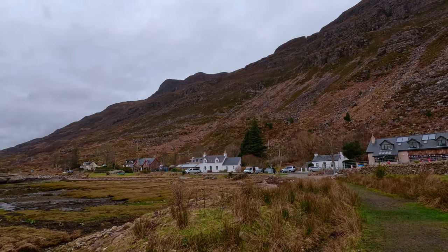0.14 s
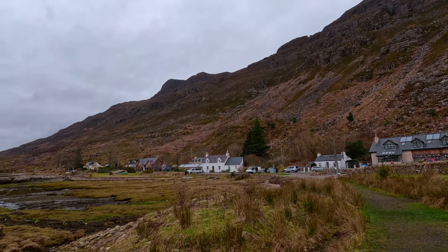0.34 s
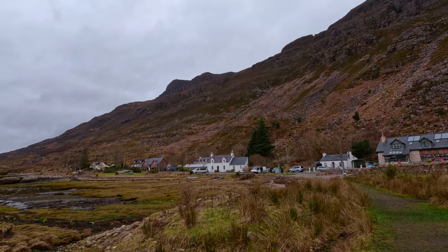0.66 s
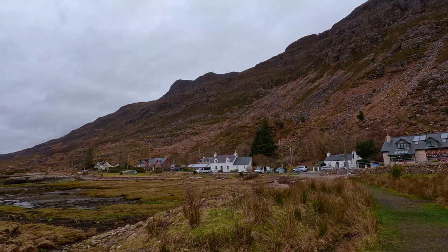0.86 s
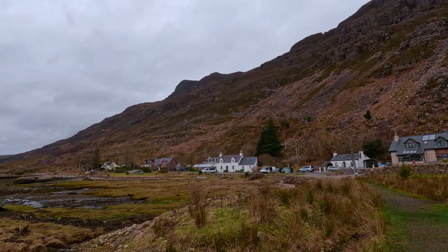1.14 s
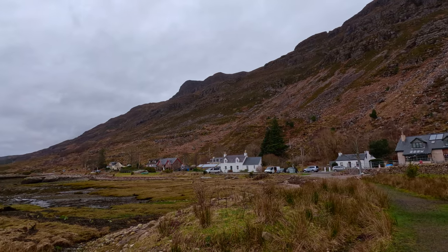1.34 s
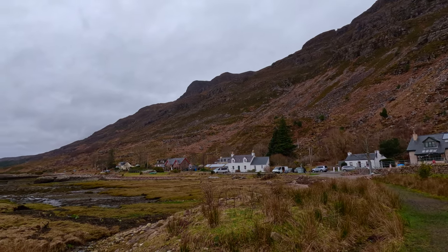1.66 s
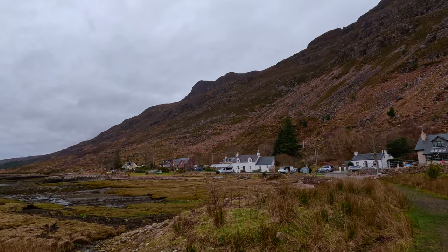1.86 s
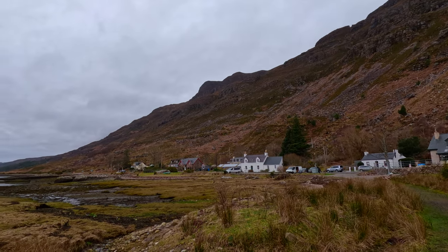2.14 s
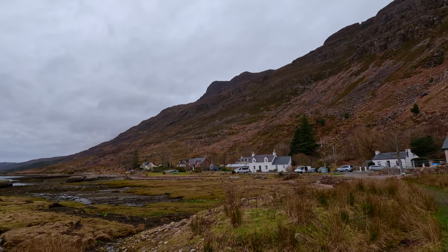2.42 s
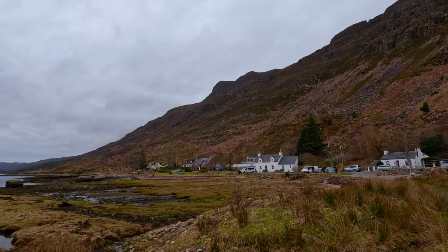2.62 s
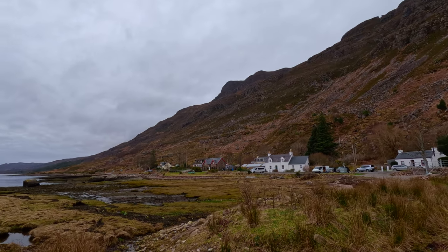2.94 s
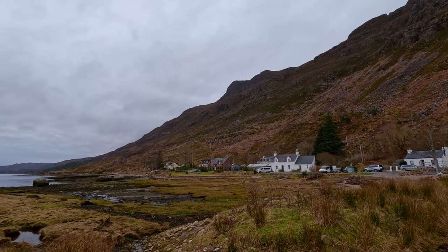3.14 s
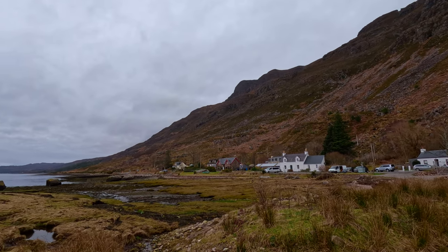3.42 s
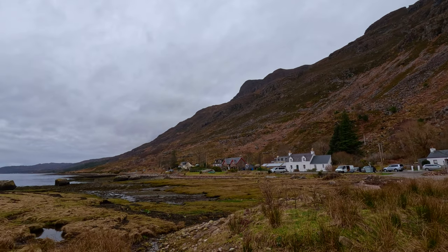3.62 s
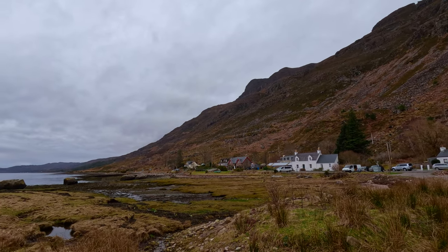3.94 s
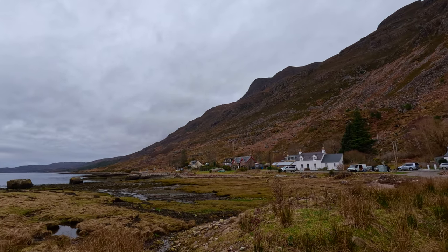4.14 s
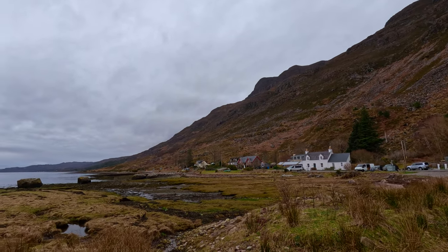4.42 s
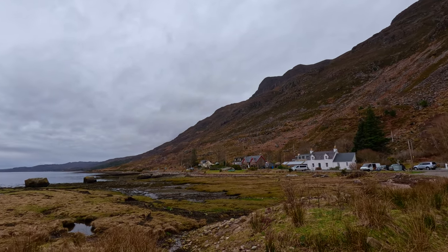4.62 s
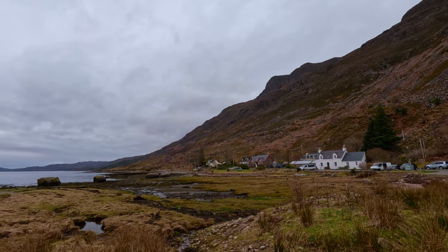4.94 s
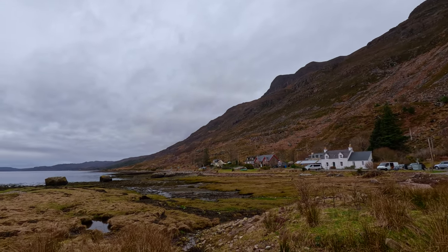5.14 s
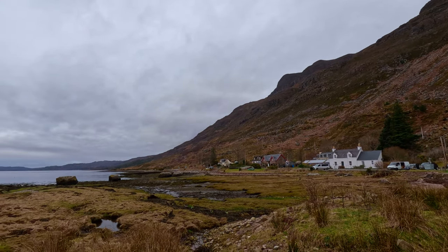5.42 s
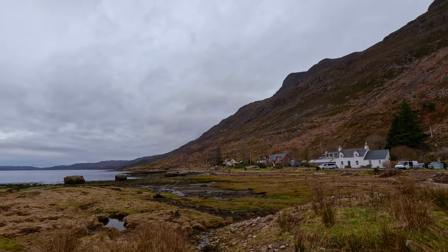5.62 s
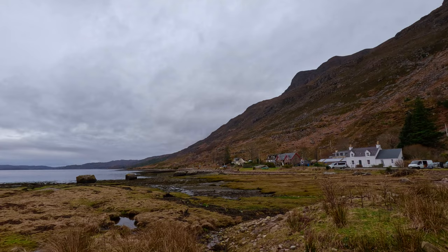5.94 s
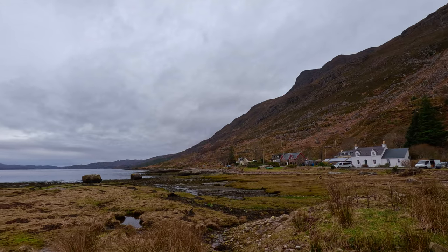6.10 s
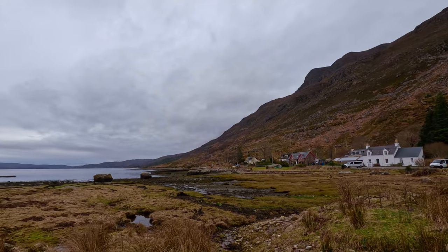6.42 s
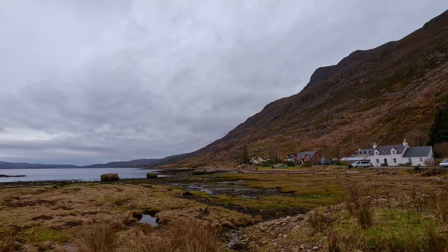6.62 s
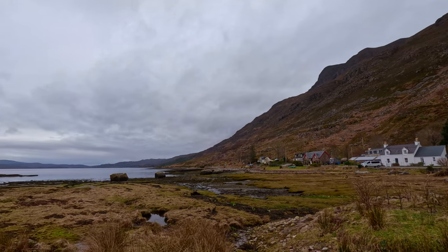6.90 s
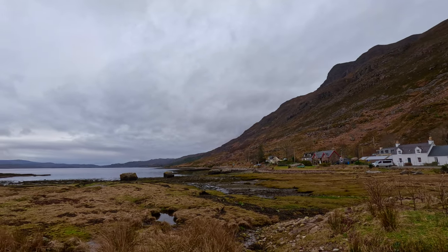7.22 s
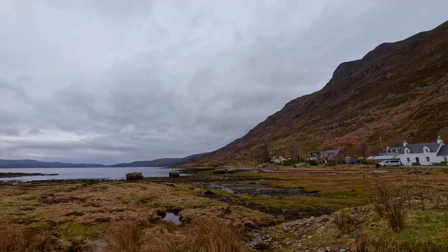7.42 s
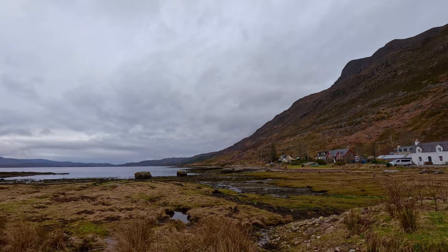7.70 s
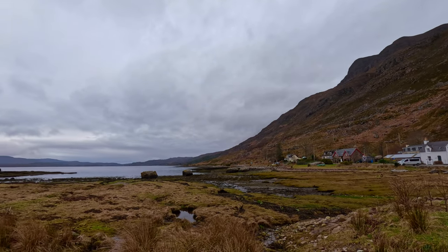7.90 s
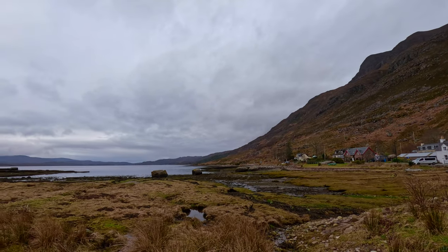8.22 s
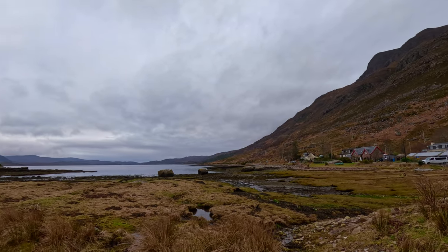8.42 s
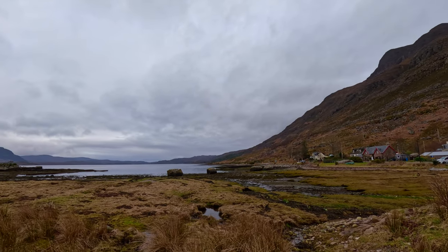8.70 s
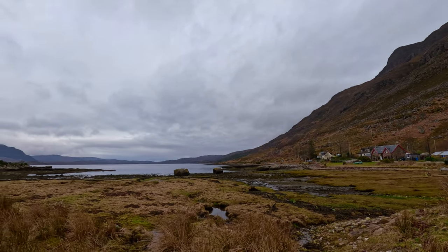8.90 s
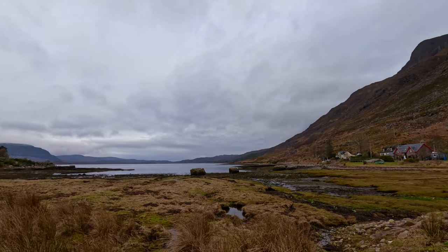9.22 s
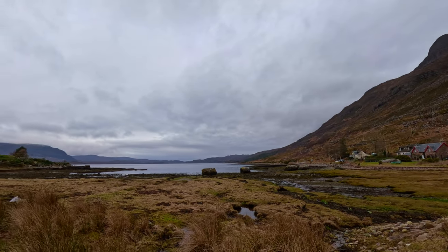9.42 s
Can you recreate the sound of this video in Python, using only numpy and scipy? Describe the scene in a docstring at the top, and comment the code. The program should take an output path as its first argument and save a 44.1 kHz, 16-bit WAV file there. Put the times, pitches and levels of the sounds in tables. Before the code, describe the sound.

A handheld stereo microphone catches sparse birdsong in open country. Whistles and thin distant chirps lead to two hoarse tweets, repeated buzzing calls and a short sparkling song, nearer and clearer on the left. Then a remote thud returns from the hillside. Light wind rumbles on the microphone, growing at the close, with soft low bumps, tiny dry ticks and a wavering far engine in steady airy hush.

```python
"""Small birds call from bushes on the shore of a sea loch under a steep hill: one bright song, two tweets,
a buzzy call said four times, slurred whistles, far twitter and harsh chirps, all gliding tones with weak octaves,
thickened by sprays of echoes. Shaped noise bursts make a distant bang that comes back from the slope, and grass ticks.
The hand bumps the recorder in low swings; light wind, filtered noise under slow gusts, rumbles on the microphone
and freshens at the end. A far engine hums as a wavering tone in a steady hush of noise."""
import sys
import numpy as np
from scipy import signal
from scipy.fft import rfft, irfft, next_fast_len
from scipy.io import wavfile
from scipy.ndimage import uniform_filter1d

SR = 44100
rng = np.random.default_rng(int(sys.argv[2]) if len(sys.argv) > 2 else 0)


def generate_wav(signal):
    """Clip the signal to [-1, 1] and save it as 16-bit WAV at the path in sys.argv[1]."""
    frames = np.transpose(np.atleast_2d(signal))
    scaled = np.clip(frames, -1, 1) * 32767
    pcm = np.round(scaled).astype(np.int16)
    wavfile.write(sys.argv[1], SR, pcm)


N = 421155
TIME = np.arange(N) / SR

# All levels are relative, before the gains in the functions. Pan is left minus right; "peak" is the place
# of the loudest moment in a note, from 0 to 1; f is the centre of a glide unless a start or end is named.

# song motif: a high slide plunges to a low whistle and steps up [t/s after its start, f/Hz, level/dB]
OPENING_MOTIF = [(0, 6780, -68), (.011, 5680, -47.5), (.022, 5340, -40.5), (.026, 5810, -42),
                 (.031, 3170, -52), (.039, 3720, -41.5), (.052, 3817, -38.5), (.066, 3750, -48),
                 (.072, 4700, -50), (.087, 4595, -38), (.106, 4100, -51)]
# song motif: a trill runs into a down-slur, dips and hooks upward [t/s after its start, f/Hz, level/dB]
CLOSING_MOTIF = [(0, 5570, -50), (.012, 5200, -47.5), (.026, 5020, -40.5), (.033, 4420, -41),
                 (.043, 3910, -34.5), (.052, 3690, -37.5), (.06, 3310, -46.5), (.066, 4200, -44),
                 (.075, 4350, -42), (.082, 4370, -57)]
# repeats of each motif [t/s, reach of the notes above the pivot as a multiple, gain/dB]
OPENING_REPEATS = [(6.689, .7, -13), (6.865, 1.2, -5), (7.03, 1.0, -0.5)]
CLOSING_REPEATS = [(7.187, 0.97, 0.23), (7.320, 0.8, -1.3), (7.453, 0.29, -0.62)]
PIVOT_HZ = 4330  # only notes above this pitch change from repeat to repeat
# flourish that ends the song [t/s, f/Hz, level/dB]
FLOURISH = [(7.589, 4820, -52), (7.598, 6510, -58.5), (7.607, 7550, -61), (7.612, 5120, -55),
            (7.617, 7000, -61), (7.624, 5660, -46), (7.636, 5160, -47.5), (7.643, 5200, -59)]
# stereo balance of the song by pitch [f/Hz, pan/dB]
SONG_PAN = [(3800, 11), (4500, 2.5), (5600, 2.5)]
# spectrum of the faint noise over the high notes [f/Hz, level/dB]
HIGH_NOTE_NOISE = [(1500, -4), (4500, -3), (7000, -15), (9500, -17), (12500, -20.5)]
# rising tweets [t/s, length/s, time to the pitch leap/s, leap time constant/s, low f/Hz, top f/Hz,
# level/dB, fade by the end/dB]
TWEETS = [(4.033, 0.099, .023, .0115, 1750, 4420, -37, 12),
          (4.281, 0.1, 0.027, 0.0036, 2480, 4540, -37, 22)]
# buzzy calls, one curve each [t/s, f/Hz, level/dB, flutter depth/Hz]
BUZZES = [
    [(4.575, 2430, -57, 330), (4.6, 2300, -52, 220), (4.63, 2100, -56, 90), (4.655, 2280, -57.5, 50),
     (4.70, 2520, -49, 99), (4.727, 2514, -51, 80), (4.742, 2680, -47.5, 190), (4.768, 2330, -53, 90)],
    [(5.476, 2280, -56, 200), (5.5, 2260, -52, 70), (5.52, 2480, -48, 110), (5.543, 2430, -48.5, 120),
     (5.567, 2180, -54, 150), (5.6, 2514, -47.5, 90), (5.64, 2547, -49, 90), (5.66, 2803, -46.5, 260),
     (5.68, 2483, -46, 160), (5.697, 2150, -54, 60)],
    [(6.278, 2070, -58, 40), (6.305, 2270, -50.5, 130), (6.327, 2500, -48.5, 150), (6.365, 2100, -53, 129),
     (6.388, 2180, -51, 130), (6.408, 2580, -48.5, 260), (6.432, 2490, -44, 81), (6.453, 2520, -43, 70),
     (6.476, 2737, -47, 251.6), (6.504, 2240, -51, 110)],
    [(7.06, 2120, -56, 39.8), (7.082, 2220, -53, 50.1), (7.095, 2450, -47.5, 70), (7.125, 2740, -51.5, 190),
     (7.16, 2170, -54.5, 130), (7.19, 2380, -51, 200), (7.23, 2480, -45.5, 110), (7.252, 2648, -45.5, 170),
     (7.27, 2300, -55, 100)],
]
BUZZ_ATTACK_S, BUZZ_RELEASE_S = 0.0034, 0.0035
# short churrs [t/s, length/s, f/Hz, level/dB]
CHURRS = [(4.999, 0.055, 2440, -53.5), (5.923, 0.071, 2510, -55.5), (6.705, 0.047, 2414, -52)]
# whistles [t/s, length/s, start f/Hz, middle f/Hz, end f/Hz before the hook, level/dB, peak, pan/dB]
ARCHED_WHISTLES = [(-0.06, 0.091, 2100, 2810, 2720, -51, 0.47, -1),
                   (0.909, 0.085, 1984, 2863, 2640, -51, 0.9, 2),
                   (1.57, 0.057, 1970, 2330, 2410, -61.5, 0.8, 2)]
FALLING_WHISTLES = [(.082, .15, 2520, 2320, 2347, -49.5, 0.9, 1.8),
                    (1.043, .16, 2650, 2407, 2250, -49.7, 0.74, 1.3)]
HOOK_S = 0.0069  # time constant of a whistle's closing hook
THROB_S, THROB_RATE_HZ = 0.1, 110.6  # the falling whistle's opening throb: duration and rate
# far down-slurs [t/s, f/Hz, level/dB, pan/dB]
SLURS = [(.255, 4000, -66.5, 1), (.378, 3780, -66, -1), (0.506, 3920, -66, 1), (0.551, 5220, -63.5, -5),
         (0.592, 5600, -63, -6), (.683, 5200, -65.5, -7), (0.727, 5400, -59, -5), (2.919, 3670, -54.5, -4),
         (3.45, 4720, -65, -2), (3.483, 3680, -56.5, -4), (3.515, 3060, -57, 1), (3.604, 3130, -60, 4),
         (3.695, 3400, -60, 3), (3.84, 3810, -57, -3), (4.518, 5130, -61, -3), (4.744, 5240, -65, -4),
         (4.955, 5420, -67.5, -4), (5.083, 3620, -60.5, 3), (5.21, 3790, -66, 2), (5.328, 3612, -65, 2),
         (5.476, 3710, -60, -1), (8.64, 2980, -65.5, 6), (9.227, 3890, -58.5, 2), (9.321, 3290, -59.5, 4)]
SLUR_CYCLES = 140  # a down-slur lasts this many cycles, so the high ones are the quick ones
# far rising notes [t/s, length/s, f/Hz, level/dB, pan/dB]
RISES = [(1.572, .04, 4860, -69, 0), (1.729, 0.053, 6220, -66.5, -5), (1.893, 0.045, 6270, -67.5, -6),
         (3.428, 0.026, 4070, -63, -6), (3.787, 0.059, 4060, -62, -5), (7.78, 0.048, 3430, -66, 0),
         (8.70, .05, 6000, -72, -6)]
# far notes that dip and come back up [t/s, length/s, f/Hz, level/dB, pan/dB]
SCOOPS = [(2.095, 0.068, 2740, -67, -5), (3.122, 0.073, 2865, -57, -4), (8.367, 0.052, 3455, -58.5, 8),
          (8.522, 0.055, 2750, -65, 8), (8.672, 0.059, 5090, -69.5, -3)]
# thin, nearly level whistles and pips [t/s, length/s, f/Hz, level/dB]
THIN_NOTES = [(1.79, 0.21, 8100, -93), (2.04, .05, 7700, -81), (2.16, 0.1, 7740, -84),
              (2.33, 0.081, 6720, -74), (2.507, 0.03, 6120, -70), (2.57, 0.088, 7400, -69.5),
              (2.641, 0.21, 7430, -78), (2.212, 0.018, 4180, -66.5), (2.858, 0.04, 4740, -59.5),
              (4.2, 0.087, 7450, -74), (7.765, 0.059, 4300, -67.5), (7.818, 0.069, 4240, -67),
              (7.983, 0.12, 4330, -68), (8.075, 0.14, 4320, -68), (8.81, 0.17, 7840, -77.5),
              (9.02, 0.082, 8050, -74.5), (9.42, .13, 7320, -83), (9.21, 0.02, 4020, -65),
              (9.312, 0.017, 4150, -61), (9.401, .013, 4570, -62.5), (9.436, 0.021, 4240, -60.5),
              (9.44, 0.034, 3750, -61), (9.465, 0.028, 4300, -59.5), (9.52, .013, 4650, -62.5)]
# quavering notes [t/s, length/s, f/Hz, level/dB]
QUAVERS = [(3.432, 0.039, 3210, -55.5), (7.818, 0.072, 3700, -64), (8.285, 0.049, 3060, -62.5)]
# far note shapes: start and end pitch as multiples of the middle pitch
SLUR_ARC, RISE_ARC, SCOOP_ARC, THIN_ARC = (1.16, .91), (0.79, 0.9), (1.25, 1.1), (1.014, 0.96)
# faint upward flick after a down-slur [start multiple, end multiple of the middle pitch]
REBOUND_ARC = (.87, 1.15)
# harsh, sparrow-like chirps [t/s, length/s, f/Hz, level/dB]
CHIRPS = [(.02, 0.09, 3740, -69), (0.626, 0.054, 2960, -66), (0.795, 0.08, 3420, -66),
          (0.781, 0.064, 4950, -71), (1.072, 0.039, 3450, -64), (2.696, 0.038, 5300, -68.5),
          (2.724, 0.085, 3090, -65), (2.89, .05, 5160, -69), (2.908, 0.063, 3110, -64),
          (3.007, 0.037, 2520, -61), (3.356, .04, 4090, -66), (3.405, 0.023, 3590, -64),
          (3.879, 0.082, 3490, -66.5), (4.498, 0.082, 3880, -69), (5.064, 0.05, 3380, -63.5),
          (5.908, 0.074, 3160, -63), (6.049, .11, 3250, -65.5), (6.255, 0.069, 3750, -66.5),
          (9.299, 0.041, 3400, -63.5)]
# delay of the left port, in samples, for birds in front and off to the side
FRONT_LAG, SIDE_LAG = 2, 6

BANG_S, BANG_DB = 8.158, -43
# spectrum of the bang [f/Hz, level/dB]
BANG_COLOUR = [(250, -25), (420, -17), (600, -1), (820, 2.5), (1030, -1), (1400, -13), (1700, 4),
               (2300, -12), (2700, -6.5), (3200, -20), (4400, -20), (7000, -47)]
# spectrum of the answer from the slope [f/Hz, level/dB]
SLOPE_COLOUR = [(300, -19), (700, -8.5), (1600, 0), (2600, -9.5), (4500, -13.5), (8000, -55)]
# dry ticks in the grass, and a harsh click as the buzzy call starts at 5.476 s [t/s, level/dB]
TICKS = [(0.31, -70), (0.6397, -69), (1.171, -67), (1.544, -72), (2.781, -69.5), (3.6444, -71),
         (3.6632, -66), (3.7299, -69), (4.497, -70), (5.6316, -70), (3.385, -84), (5.476, -74.5),
         (6.073, -71)]
# faint knocks [t/s, level/dB, f/Hz]
KNOCKS = [(.405, -57, 1740), (3.384, -55, 1850), (4.359, -56, 1790), (6.822, -58, 1255), (7.70, -55, 735),
          (8.46, -56, 1040)]
# spectrum of ticks and of the tweets' hiss [f/Hz, level/dB]
HISS = [(1000, -24), (3000, 3.5), (7000, 0), (9000, -12), (12500, -26), (15000, -39)]
# low thumps on the microphone [t/s, length/s, f/Hz, level/dB]
THUMPS = [(0.097, 0.12, 53.7, -42), (1.558, 0.2, 29.6, -36.5), (3.511, 0.062, 32.3, -33),
          (4.814, 0.063, 48, -33.5), (5.921, 0.076, 42, -40), (6.184, 0.11, 41, -39.5),
          (7.625, 0.083, 46, -31)]
# spectra of the slow and the quick wind pressure on the microphone [f/Hz, level/dB]
RUMBLE = [(10, 5), (24, 4), (48, -3.5), (80, -11), (150, -27), (400, -66)]
EDDIES = [(40, -36.5), (90, 2.5), (170, -2), (270, -10), (400, -24), (800, -54.5)]
# wind layers: level at the start (dB), growth (dB per s), added gain once fresh (dB)
RUMBLE_LEVEL, EDDY_LEVEL = (-53.5, 0.82, 8.6), (-73, 1.614, 3.7)
FRESHENS_S, FRESHEN_TIME_S = 8.39, 0.95
# single buffets of wind [t/s, level/dB]
BUFFETS = [(8.766, -49.5), (8.827, -48), (8.874, -48), (9.104, -48.5), (9.156, -40.5), (9.312, -46.5),
           (9.368, -45), (9.474, -51)]
# far engine [t/s, f/Hz, level/dB]
ENGINE = [(0, 97, -53.5), (1.3, 94.4, -67.5), (2.2, 96.84, -56), (3.2, 105.8, -79), (4.2, 108.5, -57.5),
          (5.6, 116.3, -59.5), (6.5, 119, -63.5), (7.3, 118, -51), (8.2, 117.2, -63)]
# spectrum of the distant hush [f/Hz, level/dB]
AIR = [(40, -31.5), (100, -7), (170, -16.5), (340, -26), (520, -28), (850, -31.5), (1020, -26), (1400, -25),
       (2600, -32), (4300, -38), (7500, -45), (8800, -54.5), (12000, -64), (14000, -73.5)]
AIR_DB, TREBLE_HZ = -60.5, 3500
TOP_HZ = 13500  # upper limit of the band


def birds():
    """Scattering: near birds stay clear, thickened by the twigs and ground around them; far ones are wetter."""
    close = scatter(song(), wet_db=-8.5, t60=.06) + scatter(tweets(), wet_db=-12, t60=.04)
    near = scatter(close, wet_db=-21, t60=.6)
    middle = scatter(whistler(), wet_db=-9.5, t60=.5) + scatter(buzzy_bird(), wet_db=-8, t60=.75)
    far = scatter(twitter(), wet_db=-5.5, t60=.45) + scatter(chirps(), wet_db=-2, t60=.4)
    return near + middle + far


def song(noise_db=-13, high_hz=6200):
    """Frequency glides: two motifs three times each, then a flourish; a little shaped noise follows the highest notes."""
    tone = sum(phrase(rows) for rows in repeated(OPENING_MOTIF, OPENING_REPEATS))
    tone += sum(phrase(rows, warble_hz=402) for rows in repeated(CLOSING_MOTIF, CLOSING_REPEATS))
    tone += phrase(FLOURISH, rough=0.013)
    high = signal.sosfilt(signal.butter(4, high_hz, "high", fs=SR, output="sos"), tone)
    high_level = uniform_filter1d(np.abs(high).mean(axis=0), SR // 200)
    return tone + undb(noise_db) * high_level * noise(HIGH_NOTE_NOISE, 0.79)


def repeated(motif, repeats):
    """Scaling above a pivot: low notes keep their pitch while high ones reach more or less far."""
    return [[(s + after, min(hz, PIVOT_HZ) + reach * max(hz - PIVOT_HZ, 0), db + gain_db)
             for after, hz, db in motif]
            for s, reach, gain_db in repeats]


def phrase(rows, warble_hz=0, warble_s=0.035, warble_rate=165, rough=0.0093, flutter=0.3):
    """Frequency modulation of one unbroken stroke, optionally trilled at first; low notes lie further left."""
    s, pitch, db = np.transpose(rows)
    t = np.arange(s[0], s[-1], 1 / SR)
    age = t - s[0]
    trill = warble_hz * np.cos(2 * np.pi * warble_rate * age) * np.exp(-(age / warble_s) ** 10)
    glide = uniform_filter1d(np.interp(t, s, pitch), size=130)
    hz = glide * (1 + rough * walk(700, len(t))) + trill
    gain = undb(np.interp(t, s, db)) * signal.windows.tukey(len(t), 1 / 20)
    gain *= 1 + flutter * walk(264, len(t))
    pan_db = np.interp(hz, *np.transpose(SONG_PAN))
    out = np.zeros((2, N))
    add(out, s[0], syrinx(hz, gain, pan_db, SIDE_LAG, overtone_db=-52))
    return out


def tweets(rasp_rough=0.014, octave_db=3, upper_db=-7, half_db=-8, pan_db=4, hiss_db=-11,
           drop_hz=650, drop_s=0.0048, hoarse_db=-19.0, full_rasp=0.62):
    """Overtones and half-tones with hiss make a hoarse start that clears as the pitch climbs, then drops."""
    multiples = np.arange(3, 9) / 2
    partial_dbs = [half_db, octave_db, half_db, upper_db, half_db + 2 * upper_db, 3 * upper_db]
    out = np.zeros((2, N))
    for s, length, leap_at, leap_s, low_hz, top_hz, db, fade in TWEETS:
        t = np.arange(int(length * SR)) / SR
        climb = 1 / (1 + np.exp((leap_at - t) / leap_s))
        rasp = 1 - climb
        pitch = low_hz + (top_hz - low_hz) * climb - drop_hz * np.exp((t - length) / drop_s)
        hz = pitch * (1 + (0.0044 + rasp_rough * rasp) * walk(1240, len(t)))
        # the hoarse start is quieter than the clear whistle
        gain = undb(db + hoarse_db * np.minimum(rasp / full_rasp, 1) ** 2 - fade * (t / length) ** 3)
        gain *= signal.windows.tukey(len(t), .16)
        add(out, s, syrinx(hz, gain * (1 - .5 * rasp), pan_db, SIDE_LAG - 1, overtone_db=-40))
        for multiple, partial_db in zip(multiples, partial_dbs):
            partial_gain = gain * undb(partial_db) * rasp ** (multiple - .5)
            add(out, s, syrinx(hz * multiple, partial_gain, pan_db, FRONT_LAG, overtone_db=-33))
        add(out, s, gain * undb(hiss_db) * rasp * noise(HISS, 0.82, len(t)))
    return out


def buzzy_bird(buzz_rate=185, throb=0.038, flutter=0.17, buzz_db=-1.0, rough_hz=20,
               churr_rate=75, churr_hz=330):
    """Frequency modulation: a fast syrinx flutter of varying width, with churrs of rising sweeps between calls."""
    out = np.zeros((2, N))
    for call in BUZZES:
        s, *controls = np.transpose(call)
        t = np.arange(s[0], s[-1], 1 / SR)
        pitch, db, depth = (np.interp(t, s, c) for c in controls)
        rate = buzz_rate * (1 + 0.098 * walk(100, len(t)))
        shake = np.sin(2 * np.pi * np.cumsum(rate) / SR)
        hz = pitch + depth * shake + rough_hz * walk(600, len(t))
        ramps = np.minimum((t - s[0]) / BUZZ_ATTACK_S, (s[-1] - t) / BUZZ_RELEASE_S)
        gain = undb(db + buzz_db) * np.minimum(1, ramps)
        gain *= (1 - throb * shake) * (1 + flutter * walk(300, len(t)))
        add(out, s[0], syrinx(hz, gain, pan_db=5.5, lag=FRONT_LAG, overtone_db=-36.5))
    for s, length, centre_hz, db in CHURRS:
        t = np.arange(int(length * SR)) / SR
        sweeps = churr_hz * signal.sawtooth(2 * np.pi * churr_rate * t, .8)
        hz = centre_hz + sweeps + rough_hz * walk(600, len(t))
        gain = undb(db) * np.sin(np.pi * t / length) ** .5
        add(out, s, syrinx(hz, gain, pan_db=4.0, lag=FRONT_LAG, overtone_db=-27))
    return out


def whistler():
    """Quadratic pitch glides: arched whistles, and long falling ones that throb at first; all hook down at the end."""
    arched = notes(ARCHED_WHISTLES, FRONT_LAG, overtone_db=-32, rough=.005, edge=.6, flutter=.12, hook=.16)
    falling = notes(FALLING_WHISTLES, FRONT_LAG, overtone_db=-32, rough=.008, edge=.7, flutter=.24,
                    hook=.15, throb=.7)
    return arched + falling


def twitter(rebound_db=-9, rebound_s=0.026):
    """Shared pitch contours: far birds slur down and flick faintly up, rise, scoop, quaver and whistle thinly."""
    slurs = [(s, SLUR_CYCLES / hz, hz, db, pan_db) for s, hz, db, pan_db in SLURS]
    rebounds = [(s + length, rebound_s, hz, db + rebound_db, pan_db) for s, length, hz, db, pan_db in slurs]
    rows = shaped(slurs, SLUR_ARC) + shaped(rebounds, REBOUND_ARC)
    quick = notes(rows, FRONT_LAG, overtone_db=-37, rough=.014, edge=.6, flutter=.35)
    rows = shaped(RISES, RISE_ARC) + shaped(SCOOPS, SCOOP_ARC) + shaped(THIN_NOTES, THIN_ARC)
    plain = notes(rows, FRONT_LAG, overtone_db=-37, rough=.005, edge=.45, flutter=.28)
    quavers = notes(shaped(QUAVERS, THIN_ARC), FRONT_LAG, overtone_db=-39, rough=0.0079, edge=0.38,
                    flutter=0.16, warble_hz=220, warble_rate=75)
    return quick + plain + quavers


def chirps(rough=0.042, upper_ratio=1.5, upper_db=-11):
    """Two-voice phonation: both sides of the syrinx sound at once, unsteadily, and slide down together."""
    low = [(s, length, hz * 1.13, hz, hz * 0.78, db, .5, 0) for s, length, hz, db in CHIRPS]
    high = [(s, length, *(upper_ratio * np.array(arc)), db + upper_db, peak, pan)
            for s, length, *arc, db, peak, pan in low]
    return notes(low + high, FRONT_LAG, overtone_db=-32.0, rough=rough, edge=0.13, flutter=0.34)


def chorus(count=170, db=-76, low_hz=2900, high_hz=6200, spread_db=3, dull_db=7):
    """Air absorption: birds at the edge of hearing drop random short notes, mostly falling, the high ones duller."""
    rows = []
    for when, pitch, length, loud, side, slide in rng.random((count, 6)):
        hz = low_hz + (high_hz - low_hz) * pitch ** 2
        fall = 0.42 * slide - .16
        level_db = db + spread_db * (2 * loud - 1) - dull_db * pitch ** 2
        arc = (hz * (1 + fall), hz, hz * (1 - fall / 2))
        rows.append((when * N / SR, 0.024 + 0.048 * length, *arc, level_db, .5, 6 * (side - .5)))
    calls = notes(rows, FRONT_LAG, overtone_db=-32.0, rough=.012, edge=1.0, flutter=0.29)
    return scatter(calls, wet_db=0, t60=0.11)


def shaped(rows, arc):
    """Similar contours: notes share one pitch shape, peak midway, and lie straight ahead if no side is given."""
    return [(s, length, hz * arc[0], hz, hz * arc[1], db, .5, pan_db[0] if pan_db else 0)
            for s, length, hz, db, *pan_db in rows]


def notes(rows, lag, overtone_db, rough, edge, flutter, warble_hz=0, warble_rate=0, hook=0, throb=0):
    """Frequency and amplitude modulation: each note slides along an arc while it swells, flutters and fades."""
    out = np.zeros((2, N))
    for s, length, start_hz, middle_hz, end_hz, db, peak, pan_db in rows:
        n = int(length * SR)
        u = np.linspace(0, 1, n)
        age = u * length
        arc = np.polyval(np.polyfit([0, .5, 1], [start_hz, middle_hz, end_hz], 2), u)
        arc *= 1 - hook * np.exp((u - 1) * length / HOOK_S)
        warble = warble_hz * np.sin(2 * np.pi * warble_rate * age)
        hz = arc * (1 + rough * walk(700, n)) + warble
        swell = arch(u, peak) ** edge
        swell *= 1 + flutter * walk(260, n)
        throb_depth = throb * np.clip(2 - age / THROB_S * 2, 0, 1)
        swell *= 1 + throb_depth * np.sin(2 * np.pi * THROB_RATE_HZ * age)
        gain = undb(db) * swell / np.sqrt(np.mean(swell ** 2))
        add(out, s, syrinx(hz, gain, pan_db, lag, overtone_db))
    return out


def arch(u, peak):
    """Sinusoidal envelope: rises from 0 to 1 at the place peak and falls back to 0 as u goes from 0 to 1."""
    return np.abs(np.sin(np.pi * np.interp(u, [0, np.clip(peak, .05, .95), 1], [0, .5, 1])))


def syrinx(hz, gain, pan_db, lag, overtone_db):
    """Harmonic oscillation: a tone with its octave; phase delay makes it reach the left port lag samples later."""
    phase = 2 * np.pi * (np.cumsum(hz) - np.outer([lag, 0], hz)) / SR
    tone = np.sin(phase) + undb(overtone_db) * np.sin(2 * phase)
    # the divisor keeps the total power of the two sides constant
    balance = undb(np.outer([1, -1], pan_db) / 2) / np.sqrt(np.cosh(pan_db * np.log(10) / 20))
    return gain * tone * balance


def scatter(sound, wet_db, t60):
    """Multiple scattering: ground and bushes send back a thin spray of echoes, decaying 60 dB in t60 seconds."""
    t = np.arange(SR) / SR
    # cubing the noise leaves a few strong echoes among many weak ones
    spray = rng.standard_normal((2, SR)) ** 3 * undb(-60 * t / t60) * (1 - np.exp(-t / .004))
    spray /= np.sqrt(np.sum(spray ** 2, axis=1, keepdims=True))
    return sound + undb(wet_db) * signal.fftconvolve(sound, spray, axes=1)[:, :N]


def bang(blow_s=0.026, echo_db=-11, echo_s=0.038, echo_swell_s=0.036, tail_db=-18, tail_t60=3.3):
    """Reflection: the near slope answers a distant blow in a short swell, the far hillside in a dying wash."""
    out = np.zeros((2, N))
    t = np.arange(SR) / SR
    blow = (1 - np.exp(-t / .005)) * (np.exp(-(t / blow_s) ** 4) + .25 * np.exp(-t / .03))
    add(out, BANG_S, undb(BANG_DB) * blow * noise(BANG_COLOUR, 0.53, len(t)))
    age = t / echo_swell_s
    echo = undb(BANG_DB + echo_db) * age * np.exp(1 - age) * noise(SLOPE_COLOUR, 0.42, len(t))
    add(out, BANG_S + echo_s, echo)
    tail = undb(BANG_DB + tail_db - 60 * t / tail_t60) * noise(SLOPE_COLOUR, 0.7, len(t))
    add(out, BANG_S, tail)
    return out


def ticks(tick_db=2, tick_s=0.019, rise_s=0.00019, knock_s=0.01):
    """Impulsive excitation: dry stalks tick as decaying noise; faint knocks are noise peaked at a pitch."""
    out = np.zeros((2, N))
    t = np.arange(SR // 10) / SR
    rise = 1 - np.exp(-t / rise_s)
    for s, db in TICKS:
        add(out, s, undb(db + tick_db) * rise * np.exp(-t / tick_s) * noise(HISS, 1.0, len(t)))
    for s, db, hz in KNOCKS:
        body = [(hz / 4, -26), (hz, 0), (hz * 1.74, -5), (hz * 4, -28)]
        add(out, s, undb(db) * rise * np.exp(-t / knock_s) * noise(body, 0.92, len(t)))
    return scatter(out, wet_db=-2.0, t60=0.073)


def thumps(right_db=4):
    """Low-frequency displacement: soft pushes on the microphone, harder on the right, as uneven slow swings."""
    out = np.zeros((2, N))
    sides_db = np.array([[-right_db], [right_db]]) / 2
    for s, length, hz, db in THUMPS:
        n = int(length * SR)
        swing = np.sin(2 * np.pi * np.cumsum(hz * (1 + 0.32 * walk(77.6, n))) / SR)
        push = swing + 0.015 * noise(EDDIES, 0.46, n)
        add(out, s, undb(db + sides_db) * np.hanning(n) * push)
    return out


def wind(gust_db=2.5, puff_db=6, buffet_db=2, buffet_s=0.0088):
    """Turbulent pressure: slow swings on the ports, quick eddies in uneven puffs, and late single buffets."""
    gusts = undb(gust_db * walk(18))
    puffs = undb(puff_db * np.tanh(walk(45)))
    rumble = freshening(*RUMBLE_LEVEL) * gusts * noise(RUMBLE, 0.66)
    eddies = freshening(*EDDY_LEVEL) * puffs * noise(EDDIES, 0.79)
    out = rumble + eddies
    age = np.arange(SR // 10) / SR / buffet_s
    for s, db in BUFFETS:
        add(out, s, undb(db + buffet_db) * age * np.exp(1 - age) * noise(EDDIES, 0.54, len(age)))
    return out


def freshening(start_db, db_per_s, fresh_db):
    """Exponential growth: a wind layer climbs slowly, and more steeply when the breeze freshens."""
    fresh = np.clip((TIME - FRESHENS_S) / FRESHEN_TIME_S, 0, 1)
    return undb(start_db + db_per_s * TIME + fresh_db * fresh)


def distance(hush_db=-1.08, hum_db=-1):
    """Broadband ambience: an even hush, its treble coming and going, around the wavering tone of a far engine."""
    hz, db = curve(ENGINE)
    waver_db = 2 * walk(9)
    swell_db = .3 * walk(1.5) + .5 * walk(12)
    engine_tone = np.sin(2 * np.pi * np.cumsum(hz * (1 + 0.02314 * walk(18))) / SR)
    hum = undb(db + hum_db + waver_db) * engine_tone
    air = noise(AIR, 0.43)
    treble = signal.sosfiltfilt(signal.butter(2, TREBLE_HZ, "high", fs=SR, output="sos"), air)
    air = air + treble * (undb(1.5 * walk(10) - 1) - 1)
    return hum + undb(AIR_DB + hush_db + swell_db) * air


def undb(db):
    """Logarithmic level: decibels to amplitude gain."""
    return 10 ** (np.asarray(db) / 20)


def curve(rows):
    """Linear interpolation: the columns of a table of (t/s, ..) rows, sample by sample."""
    s, *columns = np.transpose(rows)
    return [np.interp(TIME, s, c) for c in columns]


def walk(rate, size=N):
    """Band-limited chance: random values drawn rate times a second, smoothed, with a spread near 1."""
    k = max(int(SR / rate), 1)
    held = np.repeat(rng.standard_normal(size // k + 2), k)
    return 1.71 * uniform_filter1d(uniform_filter1d(held, k), k)[:size]


def noise(colour, likeness, size=N):
    """Spectral shaping: stereo noise of rms 1; likeness is the share of power common to both sides."""
    hz, db = np.transpose(colour)
    n = next_fast_len(size)
    f = np.maximum(np.arange(n // 2 + 1) * SR / n, 1)
    # above its last point the colour falls 12 dB per octave
    gain = undb(np.interp(np.log(f), np.log(hz), db)) * np.minimum(hz[-1] / f, 1) ** 2
    common, *own = irfft(rfft(rng.standard_normal((3, n))) * gain, n)[:, :size]
    share = np.clip(likeness, 0, 1)
    y = np.sqrt(share) * common + np.sqrt(1 - share) * np.array(own)
    return y / y.std()


def add(out, s, sound):
    """Superposition: mix a sound in at a time in seconds, cut to the scene's length."""
    i = int(s * SR)
    a, b = max(i, 0), min(i + sound.shape[-1], N)
    if b > a:
        out[:, a:b] += sound[..., a - i:b - i]


def scene():
    """Superposition of everything heard from the shore path."""
    return birds() + chorus() + bang() + ticks() + thumps() + wind() + distance()


def record(dry):
    """Band limitation: a steep elliptic low-pass cuts the top."""
    return signal.sosfilt(signal.ellip(8, .2, 70, TOP_HZ, fs=SR, output="sos"), dry)


dry = scene()
out = record(dry)
generate_wav(out)
```